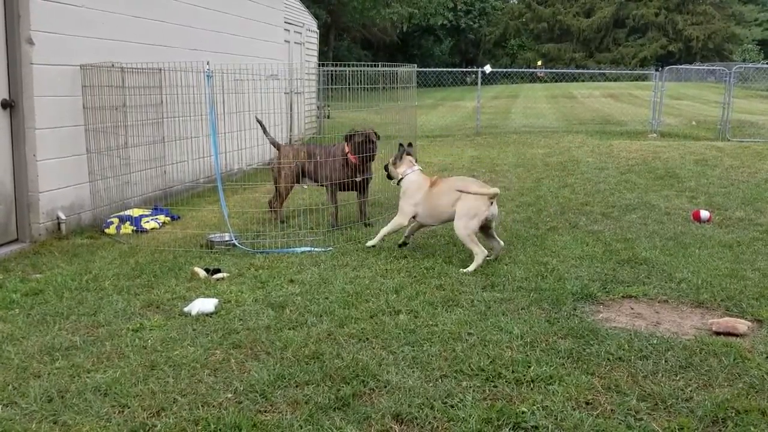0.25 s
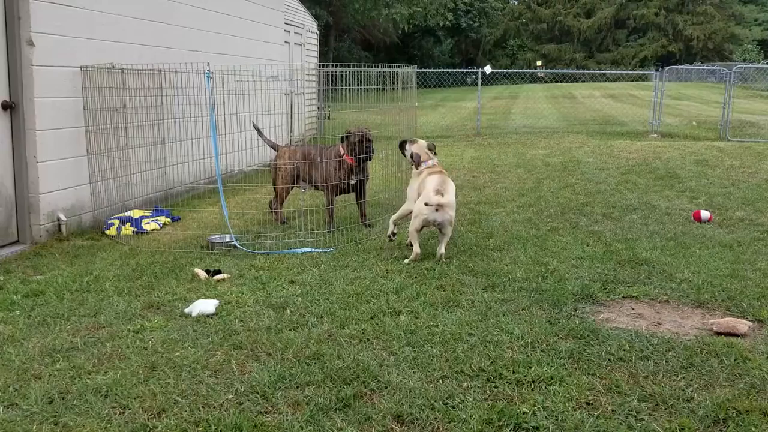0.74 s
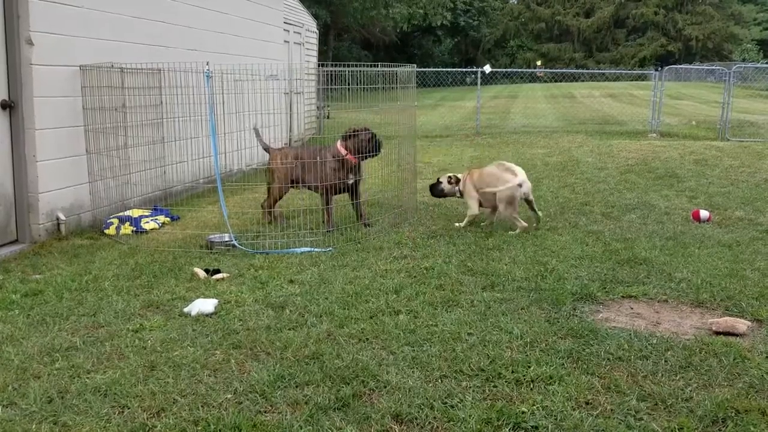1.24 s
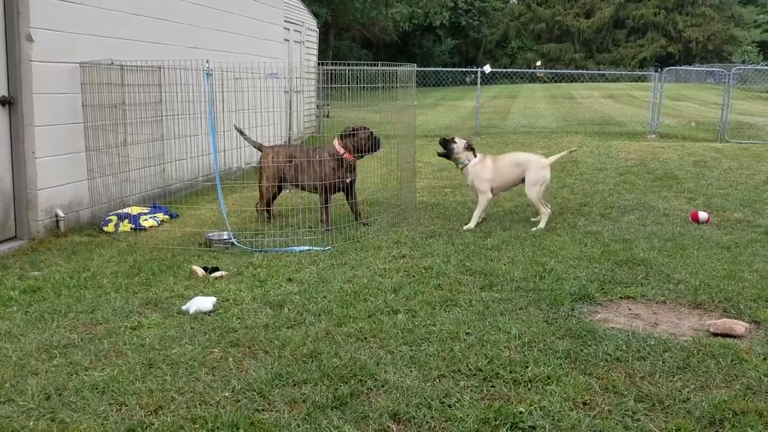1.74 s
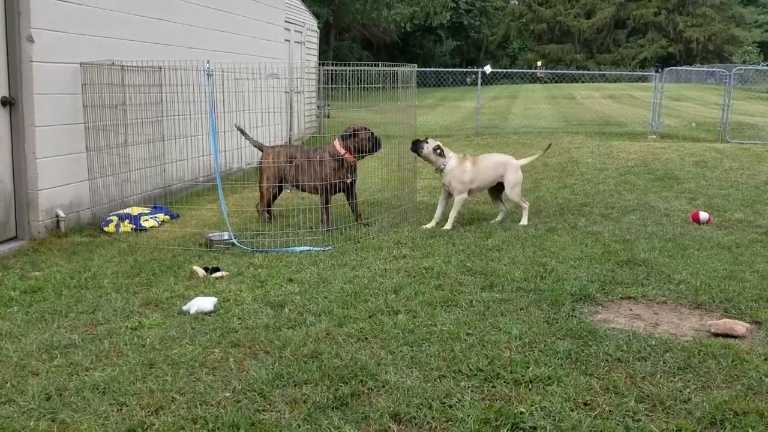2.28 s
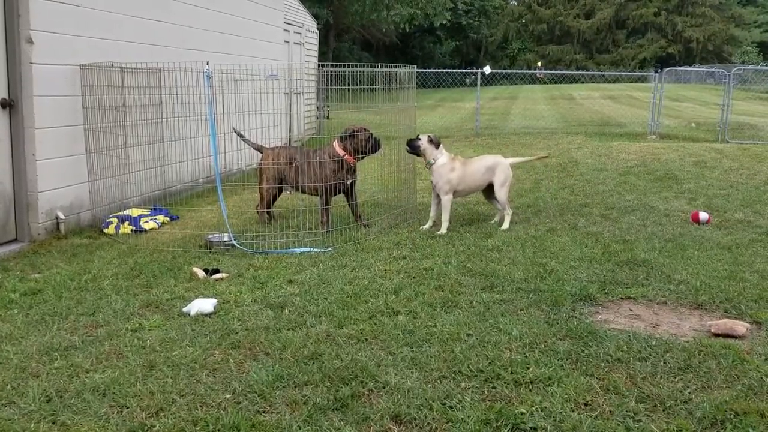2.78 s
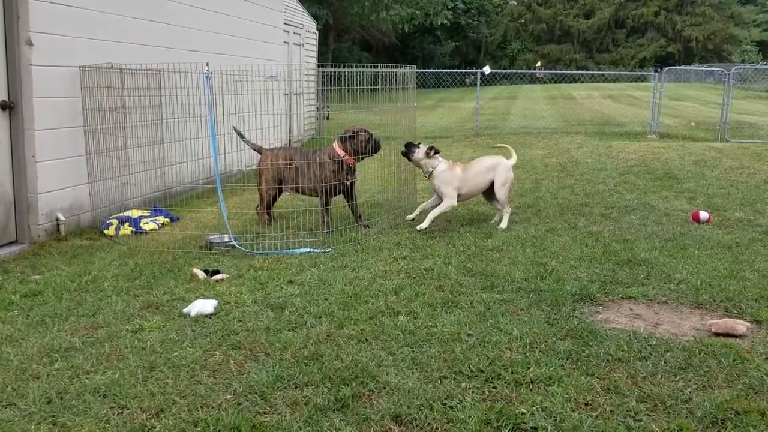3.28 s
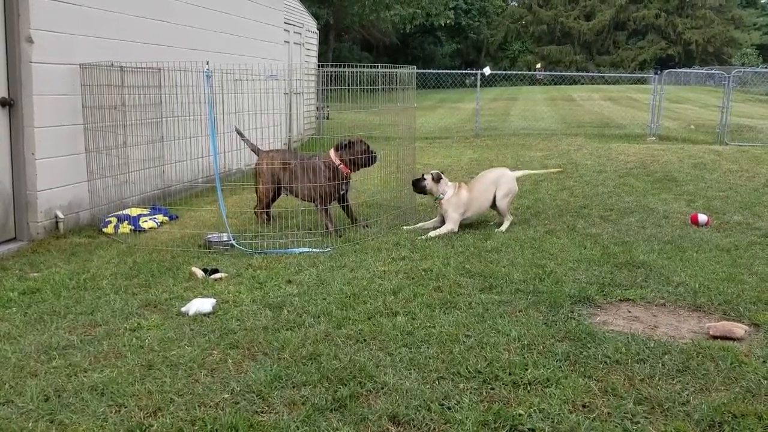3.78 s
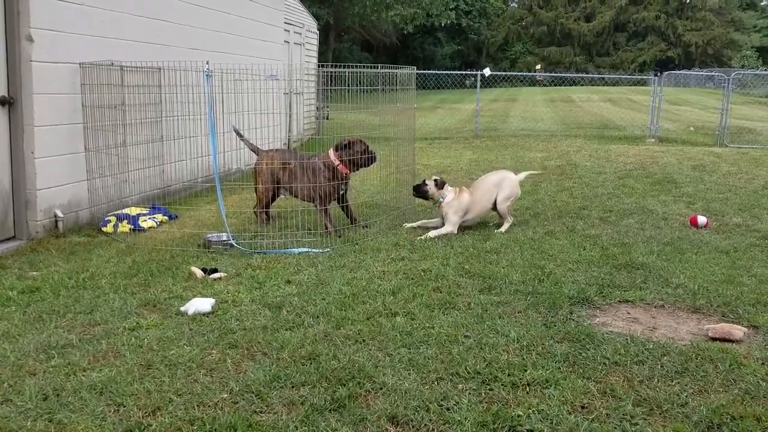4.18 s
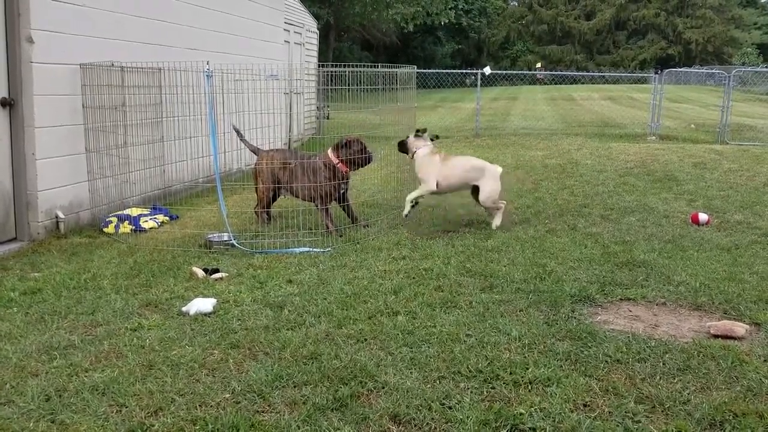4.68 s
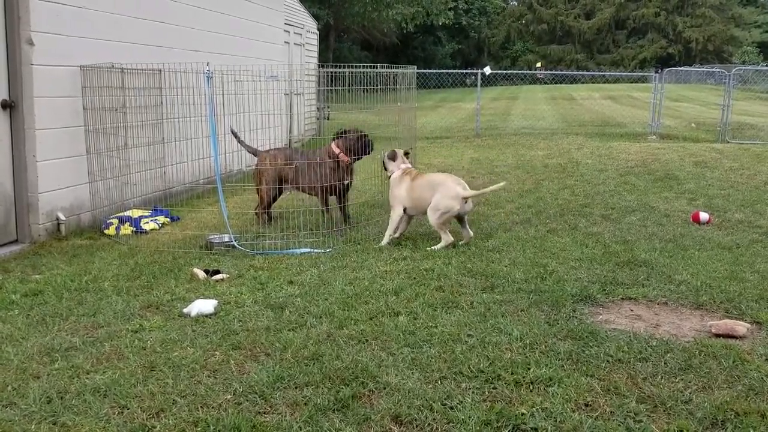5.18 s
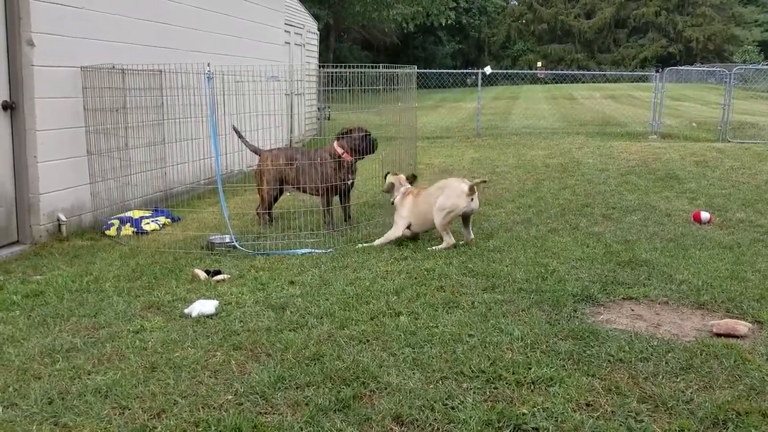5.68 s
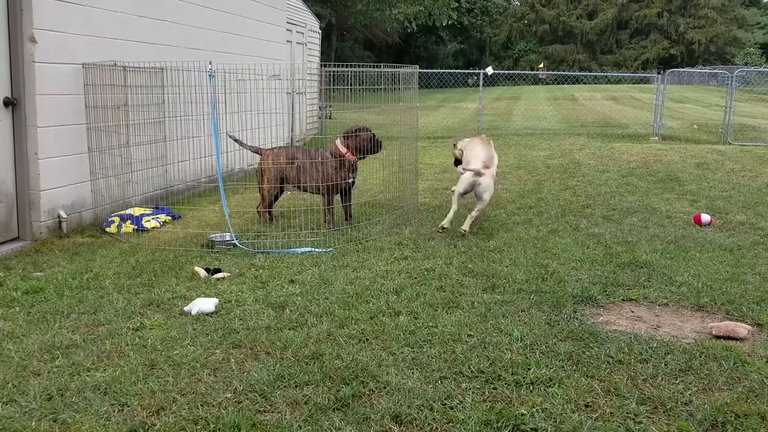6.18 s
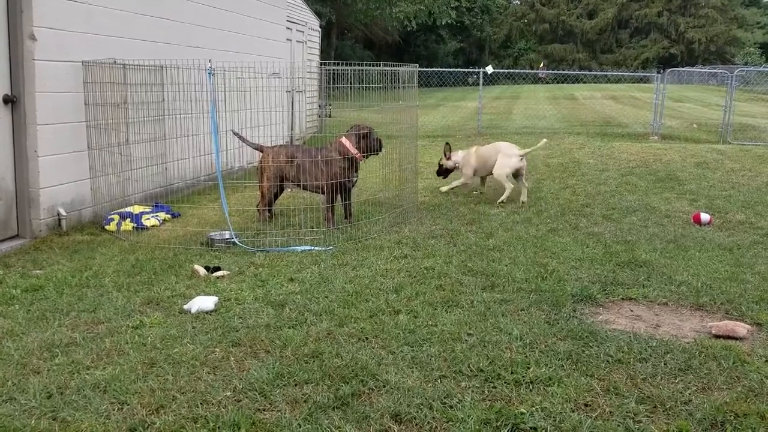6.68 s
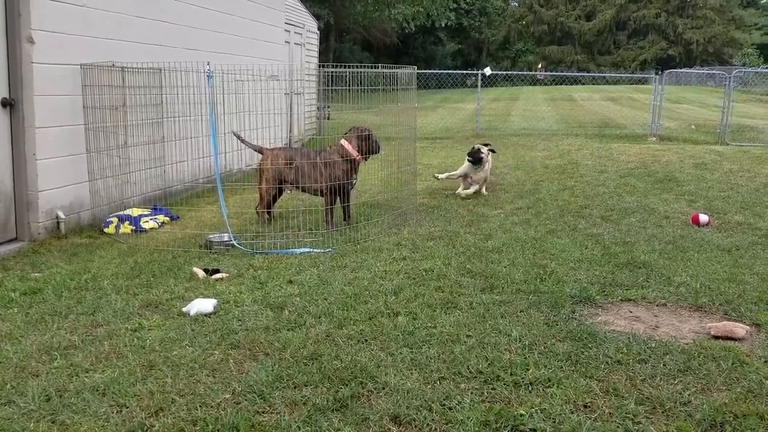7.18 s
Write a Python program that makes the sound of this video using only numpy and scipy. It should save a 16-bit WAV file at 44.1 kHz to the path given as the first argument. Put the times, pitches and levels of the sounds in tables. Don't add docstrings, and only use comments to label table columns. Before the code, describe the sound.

A large dog gives three deep, rasping barks about a second apart in an open yard, over a swelling aircraft rumble and cricket chirps.

```python
import sys
import numpy as np
from scipy import signal
from scipy.fft import rfft, irfft, next_fast_len
from scipy.io import wavfile
from scipy.ndimage import uniform_filter1d, minimum_filter1d

SR = 44100
rng = np.random.default_rng(int(sys.argv[2]) if len(sys.argv) > 2 else 0)


def field_ratio(decibels):
    return 10 ** (np.asarray(decibels, dtype=float) / 20)


def waveform_to_disk(signal):
    frames = np.transpose(np.atleast_2d(signal))
    scaled = np.clip(frames, -1, 1) * 32767
    samples = np.round(scaled).astype(np.int16)
    wavfile.write(sys.argv[1], SR, samples)


N = 328104

# freq_hz, likeness_0_1
PORT_LIKENESS = [(40, 0.8), (130, 1), (300, 0.88), (650, 0.69), (1400, 0.48), (3000, 0.07), (15000, 0.01)]
# freq_hz, left_lead_rad
PORT_LEAD = [(0, 0), (690, 0.5), (1380, 3.5), (2240, 5.5), (6800, 12), (15200, 24.5)]

# time_s, engine_db, air_path_brightness_db
AIRCRAFT = [(0.0, -55, 5), (0.62, -57.5, 2.5), (1.099, -51, -3), (1.429, -65, 7.5), (1.749, -48, -6),
            (2.2, -40, -19.5), (2.86, -43.5, -17), (3.361, -36.5, -23), (3.75, -35, -16.5),
            (3.978, -35, -14.5), (4.52, -35, -15), (4.889, -36.5, -17), (5.5, -36.5, -16.5),
            (6.498, -39, -13.5), (7.04, -37, -17), (7.44, -38, -13.5)]
# freq_hz, density_db_per_hz
RUMBLE_SPECTRUM = [(12, -49), (20, -20), (53, -9.5), (81, 0.5), (107, -7), (135, -18), (168, 0.5),
                   (201, 10), (266, -2), (317, -25), (384, -23), (420, -28.5), (550, -63.5), (920, -120)]
# freq_hz, density_db_per_hz
ROAR_SPECTRUM = [(140, -36), (230, 3), (271, -3.5), (386, -12), (481, -11.5), (746, -17.5), (959, -32),
                 (1130, -24.5), (1500, -35), (1950, -68), (3300, -120)]
# freq_hz, density_db_per_hz
LEAVES_SPECTRUM = [(1650, -31.5), (2800, -5), (3500, -6), (4660, -4.5), (5620, -7), (7870, -5.5),
                   (9280, -15.5), (11000, -14), (15600, -20.5)]
# freq_hz, density_db_per_hz
ROAD_SPECTRUM = [(500, -35.5), (850, 0.5), (1030, -8.5), (1370, -5), (1480, -7), (2390, -11), (3600, -26.5),
                 (4680, -47), (7920, -120)]
# freq_hz, density_db_per_hz
BREEZE_SPECTRUM = [(22, -11.5), (60, -2), (105, -6.5), (135, -23)]
# freq_hz, level_db
FAN = [(107.7, -59.5), (1384, -67)]

# start_s, peak_db, length_s, centre_hz, width_hz
PUFFS = [(0.062, -54, 0.078, 1166, 140), (0.25, -53, 0.098, 1115, 180), (0.32, -59, 0.11, 980, 280),
         (1.681, -52.5, .1, 960, 430), (4.4, -57, 0.07, 1124, 300), (4.945, -54, 0.075, 1100, 1300),
         (6.172, -56.5, .13, 1100, 1100), (6.599, -58, 0.14, 1900, 1700), (6.988, -50, 0.087, 1530, 470),
         (6.992, -57.5, .1, 2130, 1050), (1.092, -60, .045, 6700, 250), (5.74, -66, .2, 3280, 60),
         (6.03, -73, .19, 3400, 60), (4.712, -60, .11, 2740, 120), (1.722, -66, 0.022, 4900, 395),
         (2.056, -66, .02, 4900, 400), (.972, -33.5, 0.028, 350, 170), (1.125, -39, 0.032, 370, 200),
         (3.174, -36.5, .028, 420, 250), (4.05, -58, .03, 820, 500), (4.136, -57, .03, 800, 500),
         (2.202, -65, .025, 4940, 400), (4.7, -59, .025, 4600, 397), (4.562, -63, .025, 4500, 396)]
# time_s, level_db
CHIRPS = [(0.14, -47), (0.6475, -48.5), (1.1243, -48), (1.552, -50), (2.127, -53), (2.737, -52),
          (3.3195, -52), (3.842, -48), (4.216, -48.5), (4.652, -47.5), (5.104, -49.5), (5.581, -47.5),
          (6.0651, -48.5), (6.5448, -49), (7.0695, -49.5)]
# offset_s, level_db, start_hz
STROKES = [
    (-.0465, -5.5, 4650),
    (0, -1, 4730),
    (0.05, -0.5, 4800),
]
# start_s, level_db, rise_s, fade_s
SKIDS = [(0.204, -70, 0.027, 0.2), (3.288, -63, .012, 0.21), (4.7, -69, 0.057, 0.23),
         (4.764, -63, 0.02, 0.13), (4.976, -67, 0.027, 0.17), (5.115, -67.5, .027, .12),
         (5.19, -71, .014, .08), (5.575, -63, .008, 0.052), (5.594, -51.5, .009, 0.16),
         (5.629, -49, 0.04, 0.23), (5.8, -65.5, .06, 0.4), (6.31, -73.5, 0.054, 0.17),
         (6.8, -87, 0.023, .12), (7.018, -67.5, .034, 0.063)]
# freq_hz, density_db_per_hz
GRASS_SPECTRUM = [(880, -13), (1500, -4.5), (1970, -15), (2500, -11), (2700, -13), (3160, -11), (4190, -13),
                  (4620, -12), (5510, -10), (8000, -2.5), (9450, -16.5), (10800, -7), (15600, -10)]

# time_s, pitch_hz, effort_db, jaw_0_1, chest_partial1_db, tongue_partial3_db
VOICES = [
    [(0.998, 448, -31, 0, -1, -1), (1.018, 457.2, -13.5, 0, 0, -1), (1.03, 430.8, -15.5, 0, 2.5, 2),
     (1.038, 487, -16.5, 0.9, -1.5, 4.5), (1.054, 472.7, -8.5, 0.5, -1, 4.5),
     (1.068, 465, -7.5, 0.71, -1, 2.5), (1.082, 468.4, -9.5, 0.26, 0, 8), (1.094, 462, -9.5, 0.3, -0.5, -3),
     (1.106, 445, -14, 0.55, 0, -9), (1.135, 450, -49.5, 0.7, 0, 0)],
    [(2.152, 445, -27, .5, -12, -6), (2.176, 443.2, -13.5, 0.4, -3, -12), (2.188, 478, -14, 0.6, 5, 15),
     (2.198, 502.5, -15.5, 0.6, 9, 13), (2.208, 492, -10.5, 0.6, -6, -3), (2.225, 465.6, -8, 0.53, -7, -14),
     (2.236, 463.5, -23, 0.5, 2.5, -9), (2.26, 474.5, -44.5, 0.56, -1, 0)],
    [(3.196, 395, -38.5, .3, 0, 8.5), (3.21, 415.7, -17.5, 0, 0, 7), (3.222, 425.5, -13.5, 0.21, 0.5, 0),
     (3.236, 453.3, -14, 0.29, 0, 5), (3.25, 457.6, -12, 0.77, -0.5, 0.5),
     (3.266, 452.8, -16.5, 0.8, 1.5, 1), (3.28, 436, -16, .12, 0, -6), (3.288, 429, -17, 0.21, 0, 0),
     (3.305, 449, -41, 0, 0, 0)],
]
# time_s, breath_db, mouth_size_factor
BREATHS = [
    [(0.972, -59, 0.8), (0.992, -34.5, 0.98), (1.01, -27, 0.932), (1.046, -18.5, 0.94),
     (1.064, -21.5, 0.92), (1.14, -35, 0.84)],
    [(2.12, -65, 1.1), (2.142, -31, 1), (2.164, -22.5, 1.01), (2.212, -18, 0.917), (2.224, -18.5, 0.9),
     (2.27, -31, 0.65)],
    [(3.172, -54, 0.64), (3.182, -39.5, 0.93), (3.204, -24.5, 0.96), (3.246, -30, 0.938),
     (3.274, -18, 0.834), (3.32, -59, 0.58)],
]
# centre_hz, width_hz, level_db
THROATS = [
    [(820, 620, -1.5), (1196, 300, 6.5), (1840, 240, 5), (2320, 120, -16), (2646, 220, -4.5),
     (3687, 950, -23)],
    [(620, 220, -4), (1164, 330, 6), (1686, 400, -2.5), (2338, 370, -4.5), (2780, 440, -19.5),
     (3430, 1200, -27.5)],
    [(682, 530, -9), (1170, 230, 5.5), (1530, 324, 4.5), (2534, 250, -4), (2884, 62, -16.5),
     (3270, 870, -19.5)],
]
# pan_db, hiss_pan_db, yard_db, port_lag_factor
STANCE = [
    (1.5, 1.5, -26.5, 0.74),
    (2, 5, -23.5, 0.84),
    (-1, 9, -19.5, 1.15),
]
LOCK_TIMES = [1.045, 2.18, 3.228]
PARTIAL_LAGS = [(1, .45), (2, 1.2), (3, 1.9), (5, 5.6)]
# level_db, fade_db_per_s
FIFTH_PARTIAL = [(-20, 198), (-10.5, 2.5), (-39, 4)]
# loose_db, locked_db
LOW_THROAT = [(8.5, -5), (5.5, -12), (10, -14)]
MIDDLE_THROAT = [-10, -7, -3]
# hold_start_s, hold_end_s, level_db, rise_db, fall_db
HISS_HOLDS = [(1.008, 1.056, -49, 26, 20), (2.18, 2.22, -44, 29, 28), (3.2, 3.22, -52, 29, 23.5)]
# freq_hz, density_db_per_hz
HISS_SPECTRUM = [(2650, -43), (4500, -17.5), (5980, -1.5), (7990, -2.5), (8820, -17.5), (11000, -22.5),
                 (12200, -18.5), (15500, -29)]
# freq_hz, density_db_per_hz
SPRAY_SPECTRUM = [(8500, -12), (10500, -4), (13000, 0), (15600, -2.5)]
SPRAY_LEVELS = [-68.5, -70.5, -73.5]
# delay_s, left_db, right_db
WALLS = [(.024, -18.5, -18), (.043, -24.5, -34.5), (0.092, -29, -35), (.165, -34, -40)]
# freq_hz, t60_s, colour_db
YARD = [(251, 0.4, -5.5), (504, 0.66, 1), (1005, 1, -8), (1500, 1, -3), (1950, .95, 7), (2390, 0.92, 6),
        (3590, 0.36, 14.5), (7110, 0.46, 8), (12000, 0.2595, 1.5)]

# start_s, length_s, partial3_top_hz, partial3_db, partial4_re_3_db
JAY = [
    (1.725, .22, 2965, -60.5, -15),
    (2.058, 0.18, 2970, -67, -6),
    (4.24, .22, 2945, -59.5, -8),
    (4.573, .2, 2884, -61.5, -5),
    (4.89, 0.16, 2880, -81, 5),
]
JAY_FACING = [-7, -6, 0, -3, 0]
# multiple, re_partial3_db, facing_share
JAY_PARTIALS = [(2, -5, 0), (5, -12, 1), (7, -17, 1), (8, -11, 1)]
# start_s, level_db, length_s, pitch_hz
KNOCK = (4.966, -47, .036, 1085)

LEAVES_DB, GUST_DB, GUST_ENDS_S = -68, 3.5, 1.28
ROAD_DB, ROAD_NEARS_DB = -59.5, -4.5
SKID_SWING_DB = 25
JAW_SHUT_HZ, JAW_SPAN_HZ, JAW_WIDTH_HZ, TILT_DB_PER_OCTAVE = 450, 975, 264, -8.5
EDGE_DB = -4.5
SHIMMER_DB, SHIMMER_HZ = 2, 12
JAY_SCOOP_RATIO, JAY_SCOOP_S, JAY_SAG_RATIO, JAY_SAG_POWER = .2, .011, .075, 2.4
JAY_RISE_S, JAY_FALL_S, JAY_SWELL_DB = .05, .04, 3
DUCK_DB, DUCK_ABOVE_DB, RECOVER_S = 1.5, -24.5, 1.4


def evened(x):
    return x / np.sqrt(np.mean(x ** 2) + 1e-20)


def read(points, hz):
    f, value = np.transpose(points)
    return np.interp(np.log(hz + 1), np.log(f + 1), value)


def add(mix, start_s, sound):
    part = mix[..., round(start_s * SR):][..., :sound.shape[-1]]
    part += sound[..., :part.shape[-1]]


def columns(rows):
    s, *values = np.transpose(rows)
    t = np.arange(s[0], s[-1], 1 / SR)
    return [t] + [np.interp(t, s, v) for v in values]


def wander(n, hz):
    white = rng.standard_normal(n + 4000)
    drift = signal.lfilter([1], [1, -np.exp(-2 * np.pi * hz / SR)], white)
    return evened(drift[4000:])


def resonate(x, hz, width_hz):
    turn = np.exp(2j * np.pi * np.cumsum(hz * np.ones(x.shape[-1])) / SR)
    r = np.exp(-np.pi * width_hz / SR)
    poles = np.convolve([1, -r], [1, -r])
    return 2 * (turn * signal.lfilter([(1 - r) ** 2], poles, x / turn)).real


def ports(left, other):
    size = next_fast_len(len(left) + 256)
    hz = np.fft.rfftfreq(size, 1 / SR)
    same = np.clip(read(PORT_LIKENESS, hz), 0, 24 / 25)
    lag = np.exp(-1j * np.interp(hz, *np.transpose(PORT_LEAD)))
    right = same * rfft(left, size) + np.sqrt(1 - same ** 2) * rfft(other, size)
    return np.array([left, irfft(lag * right, size)[:len(left)]])


def noise(spectrum, n, patchy_db=1.0):
    frames, hz = n // 256 + 7, np.fft.rfftfreq(1024, 1 / SR)
    a, b, patches = rng.standard_normal((frames, 513, 2, 3)).T
    patches = uniform_filter1d(patches[0], 10, 0)
    patches = evened(uniform_filter1d(patches, 12, 1))
    outside = (hz < spectrum[0][0]) | (hz > spectrum[-1][0])
    colour_db = np.where(outside, -90, read(spectrum, hz))
    z = (a + 1j * b) * field_ratio(colour_db[:, None] + patchy_db * patches)
    pair = signal.istft(z, nperseg=1024, noverlap=768)[1]
    return evened(ports(*pair)[:, 300:n + 300])


def yard(x):
    taps = np.zeros((2, SR))
    at = np.arange(2400, SR - 20, 20) + rng.integers(0, 20, (2, (SR - 2401) // 20))
    np.put_along_axis(taps, at, rng.choice([-1., 1.], at.shape), 1)
    hz, t, z = signal.stft(taps, SR, nperseg=256)
    t60_s, colour_db = (read(np.array(YARD)[:, [0, c]], hz)[:, None] for c in (1, 2))
    pair = signal.istft(z * field_ratio(colour_db - 60 * t / t60_s), SR, nperseg=256)[1]
    tail = ports(*pair)
    return signal.fftconvolve(x, tail / np.linalg.norm(tail[0]), axes=1)


def aircraft():
    t = np.arange(N) / SR
    s, engine_db, bright_db = np.transpose(AIRCRAFT)
    engine, bright = field_ratio(np.interp(t, s, engine_db)), field_ratio(np.interp(t, s, bright_db))
    return engine * (0.93 * noise(RUMBLE_SPECTRUM, N, 0.79) + 2.02 * bright * noise(ROAR_SPECTRUM, N, 1.9))


def surroundings():
    t = np.arange(N) / SR
    leaves_db = LEAVES_DB + GUST_DB / (1 + (t / GUST_ENDS_S) ** 4)
    road_db = ROAD_DB + ROAD_NEARS_DB * np.exp(-t / 2.2)
    mix = field_ratio(leaves_db) * noise(LEAVES_SPECTRUM, N, 1.4)
    mix += field_ratio(road_db) * noise(ROAD_SPECTRUM, N, 0.93)
    return mix + field_ratio(-61.5) * noise(BREEZE_SPECTRUM, N, 1.9)


def fan():
    t, hum = np.arange(N) / SR, np.zeros(N)
    for hz, db in FAN:
        level_db = db + 2.0 * wander(N, 2.7) - 0.74 * t
        hum += field_ratio(level_db) * np.cos(2 * np.pi * np.cumsum(hz + 4.0 * wander(N, 6)) / SR)
    return np.array([hum, np.roll(hum, 6)])


def pants():
    mix = np.zeros((2, N))
    for s, db, length_s, hz, width_hz in PUFFS:
        puff = resonate(rng.standard_normal((2, 9000)), hz, width_hz)[:, -round(length_s * SR):]
        add(mix, s, field_ratio(db) * evened(ports(*puff)) * signal.windows.tukey(puff.shape[1], .7))
    return mix


def cricket():
    mix, u = np.zeros(N), np.linspace(0, 1, round(.026 * SR))
    sag = 1.012 - .03 * np.exp(-u / .12) - .1 * u ** 2.5
    for s, db in CHIRPS:
        for (later_s, stroke_db, hz), (a, b) in zip(STROKES, rng.standard_normal((3, 2))):
            tone = np.sin(2 * np.pi * np.cumsum((hz + 25 * a) * sag) / SR)
            level = field_ratio(db + stroke_db + .7 * b)
            add(mix, s + later_s - .006, level * tone * np.sin(np.pi * u) ** 0.74)
    mix = mix + field_ratio(-12.5) * np.roll(mix, 1150) + field_ratio(-16.0) * np.roll(mix, 2300)
    return ports(mix, np.roll(mix, 3)) * 0.64


def skids():
    mix = np.zeros((2, N))
    for s, db, rise_s, fade_s in SKIDS:
        t = np.arange(0, rise_s + fade_s, 1 / SR)
        swing_db = -SKID_SWING_DB * np.maximum(1 - t / rise_s, (t - rise_s) / fade_s)
        level = field_ratio(db + swing_db + 5.5 + 1.3 * wander(len(t), 240))
        add(mix, s, level * noise(GRASS_SPECTRUM, len(t), 1.3) * field_ratio([[1.5], [-1.5]]))
    return mix


def clean_partials(k, t, hz, turn, jaw, chest_db, tongue_db, settled, lag_factor):
    n = np.arange(1, 4)[:, None]
    mouth_hz = JAW_SHUT_HZ + JAW_SPAN_HZ * jaw
    gains = field_ratio(TILT_DB_PER_OCTAVE * np.log2(n)) / (1 + ((n * hz - mouth_hz) / JAW_WIDTH_HZ) ** 2)
    gains = gains * field_ratio([chest_db, 0 * jaw, tongue_db])
    gains = list(gains / np.linalg.norm(gains, axis=0))
    fifth_db, fade_db_per_s = FIFTH_PARTIAL[k]
    gains.append(field_ratio(fifth_db - fade_db_per_s * (t - LOCK_TIMES[k])) * settled)
    right = np.array([[0], [1]])
    return sum(g * np.cos(m * turn + .6 * m * m - lag_factor * lag * right)
               for (m, lag), g in zip(PARTIAL_LAGS, gains))


def growl(k, t, breath_db, mouth, turn, settled):
    locked = .15 + .7 * settled
    pulses = sum((n - 3.5) ** .5 * np.cos(n * turn) * field_ratio(4.5 * wander(len(t), 20)) for n in (4, 6, 7, 8, 9))
    pulses = 7 * evened(pulses) / 20
    puffs = rng.standard_normal((2, len(t))) * field_ratio(2.2 * wander(len(t), 150))
    drive = (1 - locked) * puffs + locked * pulses
    rung = [field_ratio(db) * resonate(drive, f * mouth, width) / np.sqrt(width) for f, width, db in THROATS[k]]
    low_db = np.interp(t, [t[0], LOCK_TIMES[k] + 0.018], LOW_THROAT[k])
    low = field_ratio(low_db) * (rung[0] - rung[1])
    middle = field_ratio(MIDDLE_THROAT[k] * settled) * rung[2]
    throat = low + middle - rung[3] + rung[4] - rung[5]
    return field_ratio(breath_db) * ports(*throat) / np.std(sum(rung[2:]))


def hiss(k, t, hz, turn, settled, pan_db):
    opens_s, shuts_s, level_db, rise_db, fall_db = HISS_HOLDS[k]
    times_s = [t[0], opens_s, shuts_s, shuts_s + .015, t[-1]]
    hiss_db = level_db - np.interp(t, times_s, [rise_db, 0, 0, 0.43 * fall_db, fall_db])
    hiss_db = hiss_db + 2 * wander(len(t), 50)
    air_db = hiss_db + np.array([[.5], [-.5]]) * pan_db + 1.5
    air = field_ratio(air_db) * noise(HISS_SPECTRUM, len(t), 4.43)
    edge = sum(field_ratio(read(HISS_SPECTRUM, n * hz) + 4 * wander(len(t), 40)) * np.cos(n * turn + n * n)
               for n in range(10, 20))
    air = air + field_ratio(hiss_db + EDGE_DB) * settled * ports(edge, edge[::-1])
    spray = signal.windows.tukey(len(t), .7) * noise(SPRAY_SPECTRUM, len(t), 3.0)
    air = air + field_ratio(SPRAY_LEVELS[k]) * spray
    return air * (1 + .5 * np.cos(turn))


def bark(k, hiss_pan_db, lag_factor):
    t, breath_db, mouth = columns(BREATHS[k])
    s, *sung = np.transpose(VOICES[k])
    hz, effort_db, jaw, chest_db, tongue_db = (np.interp(t, s, v) for v in sung)
    turn = 2 * np.pi * np.cumsum(hz * (1 + .006 * wander(len(t), 60))) / SR
    fade = np.clip((t - s[0]) / 0.0025, 0, 1) * np.clip((s[-1] - t) / 0.0066, 0, 1)
    settled = 1 / (1 + np.exp((LOCK_TIMES[k] - t) / .006))
    clean = clean_partials(k, t, hz, turn, jaw, chest_db, tongue_db, settled, lag_factor)
    rough = growl(k, t, breath_db, mouth, turn, settled) + hiss(k, t, hz, turn, settled, hiss_pan_db)
    return np.sqrt(2) * field_ratio(effort_db) * clean * fade + rough * signal.windows.tukey(len(t), .05)


def barks():
    mix, tail_n = np.zeros((2, N)), SR + 20000
    for k, (pan_db, hiss_pan_db, yard_db, lag_factor) in enumerate(STANCE):
        direct = bark(k, hiss_pan_db, lag_factor) * field_ratio([[pan_db / 2], [-pan_db / 2]])
        start_s = BREATHS[k][0][0]
        add(mix, start_s, direct)
        for delay_s, *wall_db in WALLS:
            shimmer = field_ratio(SHIMMER_DB * wander(direct.shape[1], SHIMMER_HZ))
            add(mix, start_s + delay_s, direct[::-1] * field_ratio(wall_db)[:, None] * shimmer)
        tail = np.pad(yard(direct[:1]), [(0, 0), (0, SR)])[:, :tail_n]
        add(mix, start_s, field_ratio(yard_db + SHIMMER_DB * wander(tail_n, SHIMMER_HZ)) * tail)
    return mix


def jay():
    mix = np.zeros(N)
    for (s, length_s, top_hz, third_db, fourth_db), facing_db in zip(JAY, JAY_FACING):
        t = np.arange(0, length_s, 1 / SR)
        u = t / length_s
        hz = top_hz * (1 - JAY_SCOOP_RATIO * np.exp(-t / JAY_SCOOP_S) - JAY_SAG_RATIO * u ** JAY_SAG_POWER)
        turn = 2 * np.pi * np.cumsum(hz / 3 * (1 + .004 * wander(len(t), 80))) / SR
        swell_db = JAY_SWELL_DB * u + 20 * np.log10(np.clip(t / JAY_RISE_S, .03, 1))
        parts = [(3, swell_db), (4, fourth_db + 8.5 - 10 * u ** 2)]
        parts += [(n, swell_db + db + share * facing_db) for n, db, share in JAY_PARTIALS]
        call = sum(field_ratio(db) * np.cos(n * turn) * (1 + .22 * wander(len(t), 30)) for n, db in parts)
        fade = np.clip(np.minimum(t / 0.018, (length_s - t) / JAY_FALL_S), 0, 1)
        add(mix, s, np.sqrt(2) * field_ratio(third_db) * call * fade)
    return np.array([mix, np.roll(mix, shift=15)]) + field_ratio(-17) * yard(mix[None])[:, :N]


def bowl_knock():
    mix = np.zeros((2, N))
    s, db, length_s, hz = KNOCK
    t = np.arange(0, length_s, 1 / SR)
    swell = np.sin(np.pi * (t / length_s) ** .8) ** 2
    add(mix, s, field_ratio(db) * np.sin(2 * np.pi * hz * t) * swell)
    return mix


def scene():
    steady = aircraft() + surroundings() + fan()
    return steady + pants() + cricket() + skids() + barks() + jay() + bowl_knock()


def band_limit(x):
    return signal.sosfilt(signal.butter(12, 15710, fs=SR, output="sos"), x)


def record(dry):
    power = uniform_filter1d((dry ** 2).mean(0), size=2000)
    loud = 1. * (power > field_ratio(DUCK_ABOVE_DB) ** 2)
    fall = np.arange(N) / (SR * RECOVER_S)
    ducked = np.maximum.accumulate(loud + fall) - fall - loud
    dry = dry / field_ratio(DUCK_DB * uniform_filter1d(np.maximum(ducked, 0), size=4000))
    room = minimum_filter1d(np.minimum(1, .995 / (abs(dry).max(0) + 1e-9)), size=401)
    end_fade = np.minimum(np.arange(N, 0, -1) / 100, 1)
    return band_limit(dry * uniform_filter1d(room, size=201) * end_fade)


dry = scene()
out = record(dry)
waveform_to_disk(out)
```